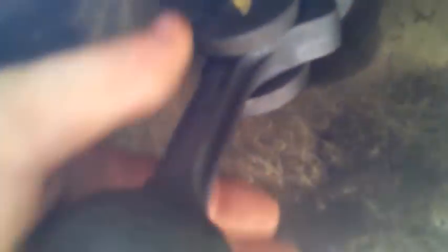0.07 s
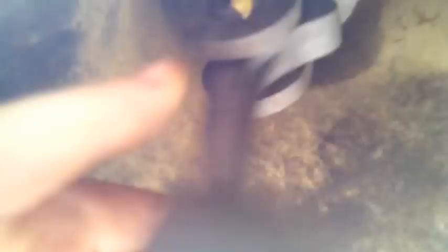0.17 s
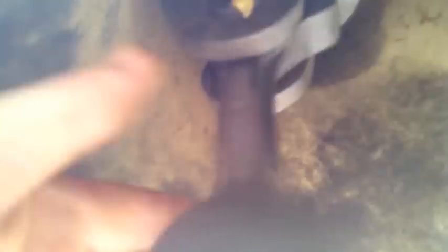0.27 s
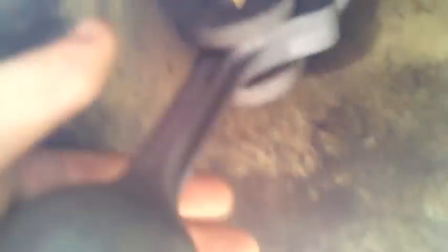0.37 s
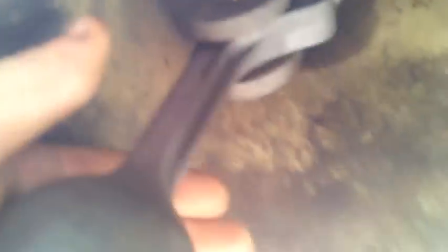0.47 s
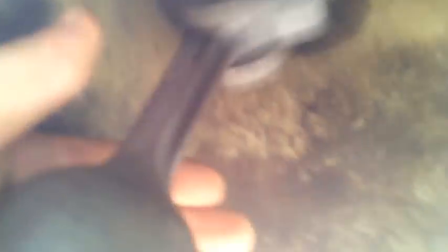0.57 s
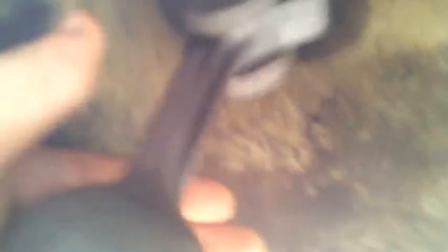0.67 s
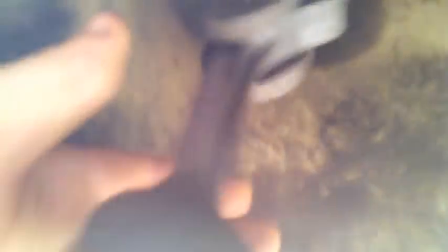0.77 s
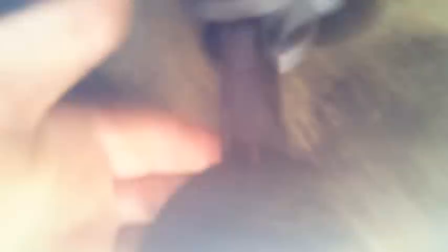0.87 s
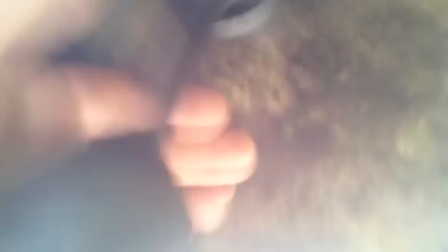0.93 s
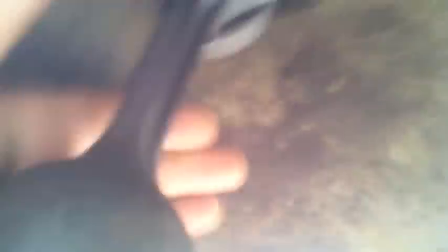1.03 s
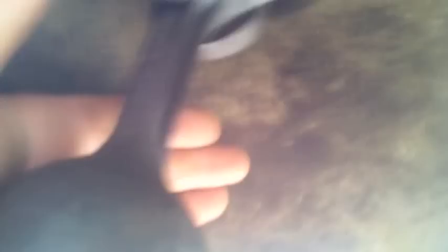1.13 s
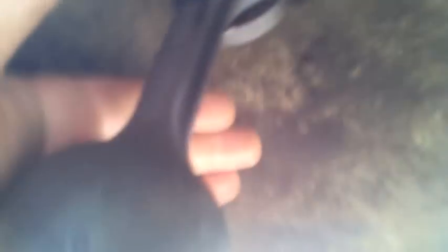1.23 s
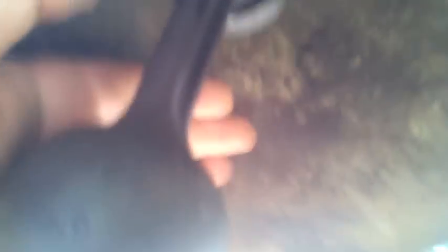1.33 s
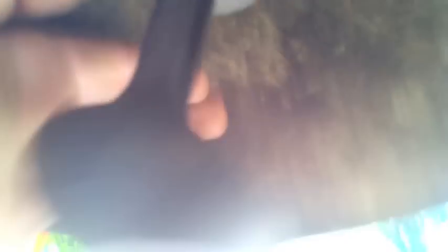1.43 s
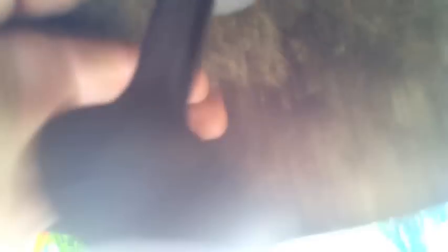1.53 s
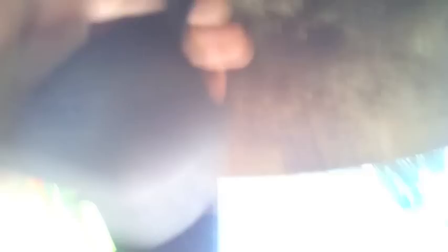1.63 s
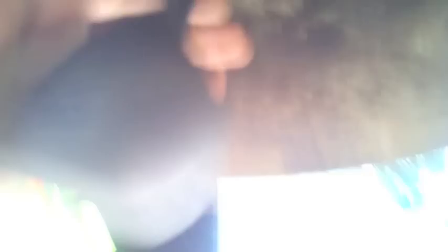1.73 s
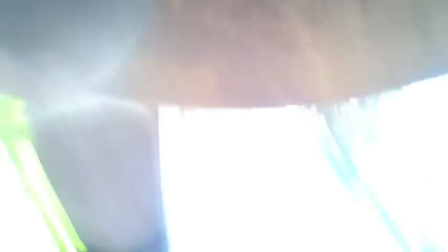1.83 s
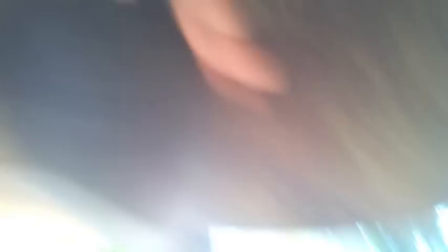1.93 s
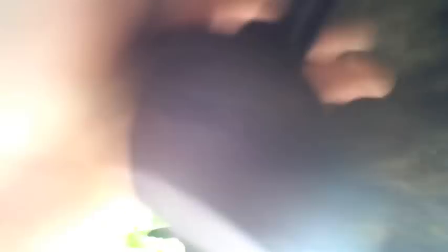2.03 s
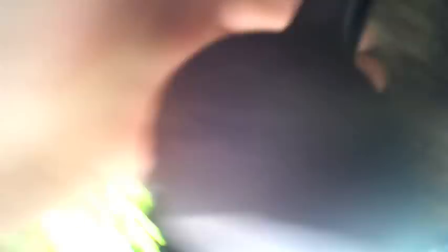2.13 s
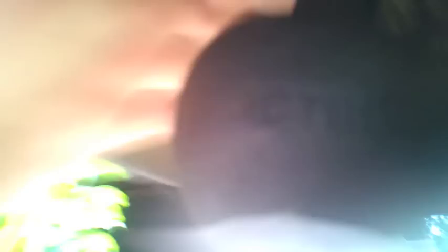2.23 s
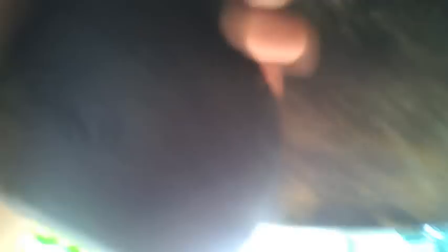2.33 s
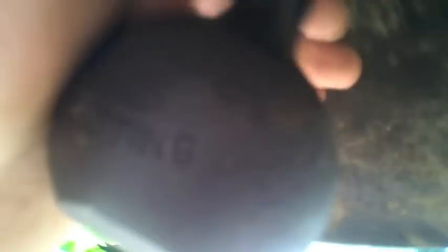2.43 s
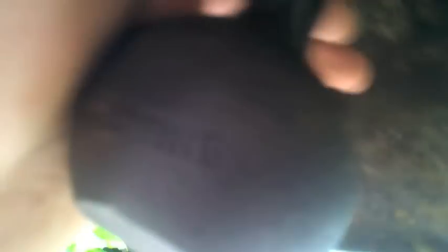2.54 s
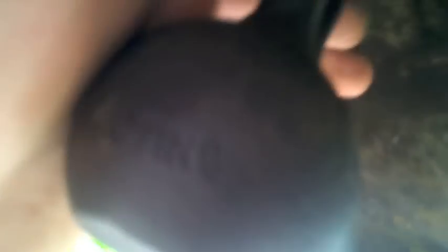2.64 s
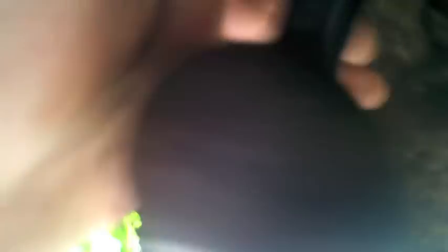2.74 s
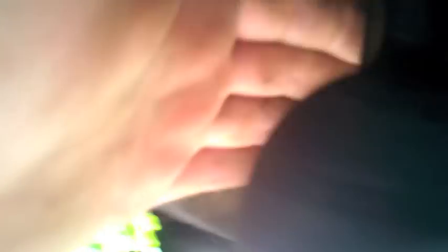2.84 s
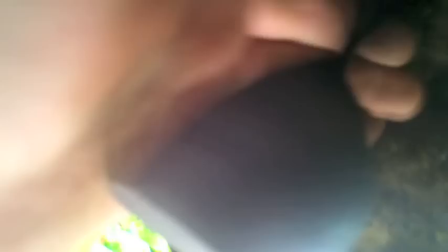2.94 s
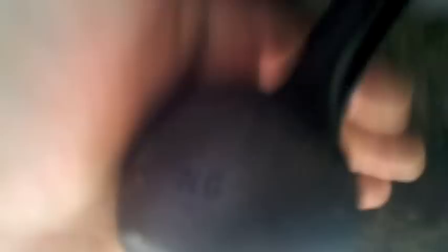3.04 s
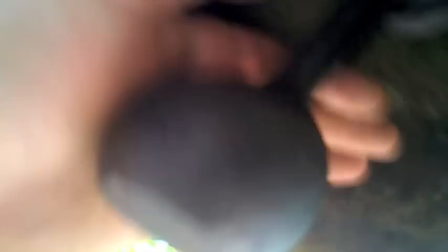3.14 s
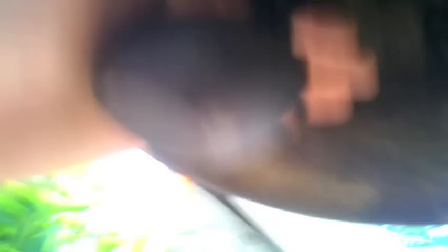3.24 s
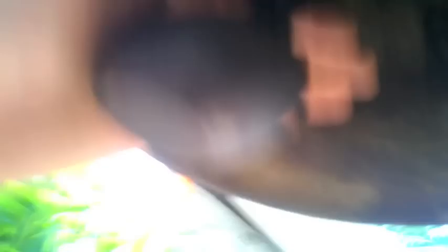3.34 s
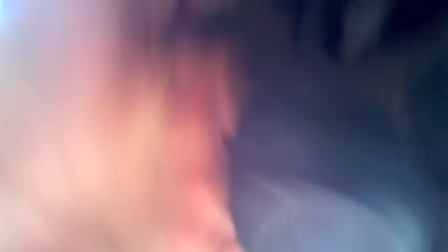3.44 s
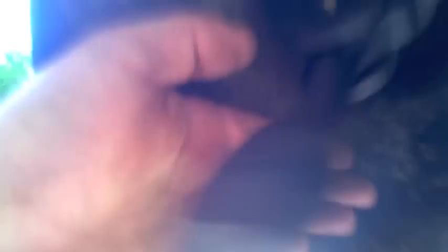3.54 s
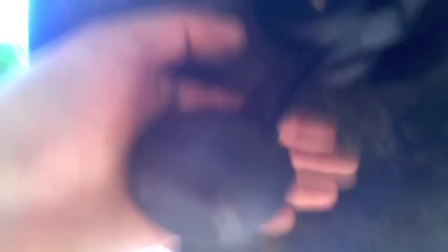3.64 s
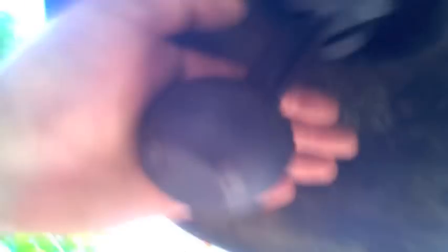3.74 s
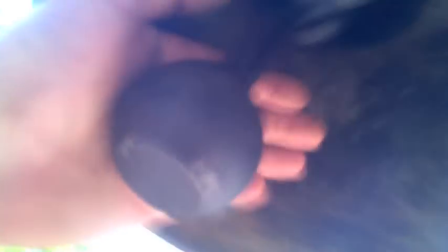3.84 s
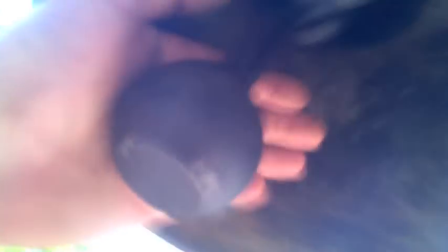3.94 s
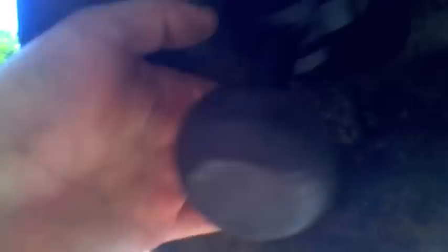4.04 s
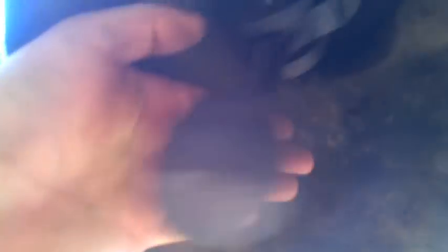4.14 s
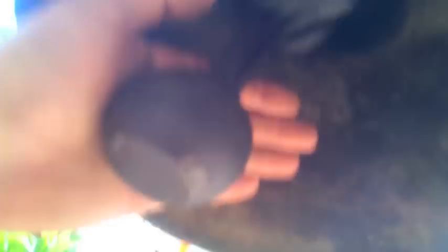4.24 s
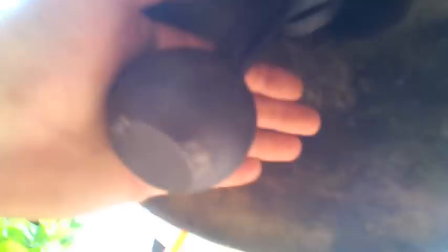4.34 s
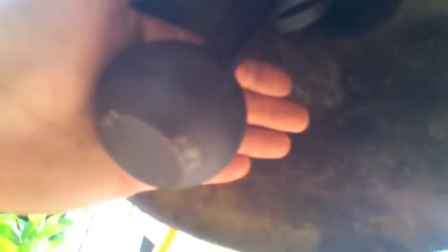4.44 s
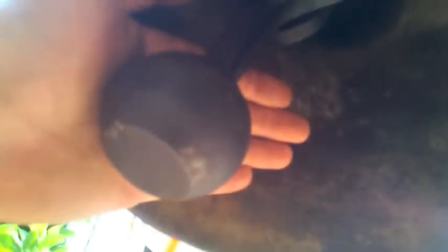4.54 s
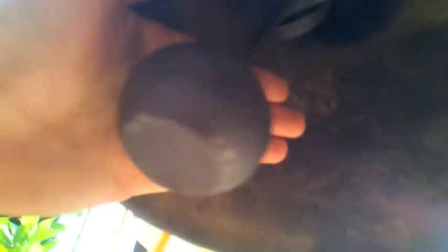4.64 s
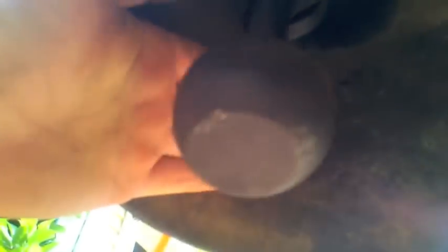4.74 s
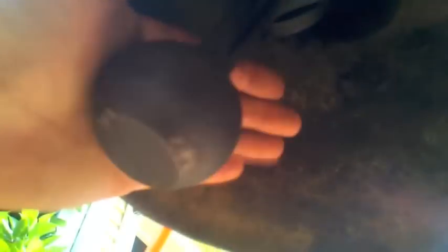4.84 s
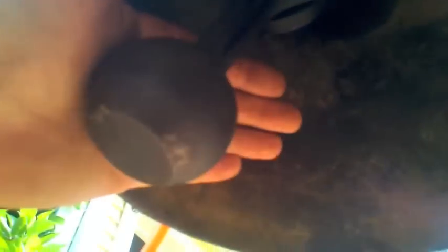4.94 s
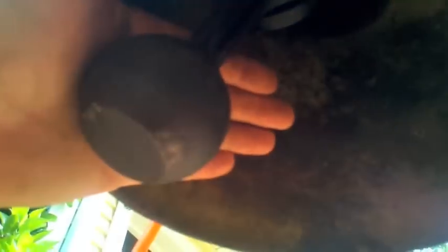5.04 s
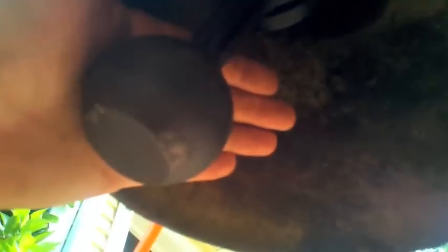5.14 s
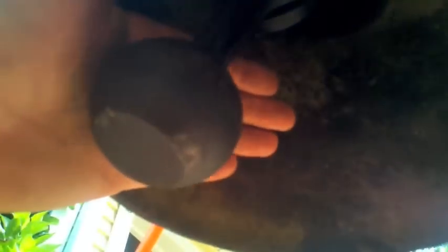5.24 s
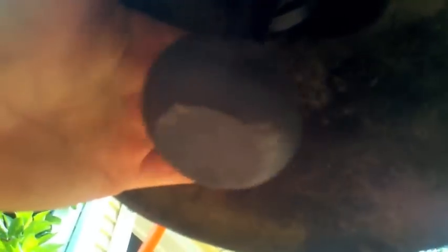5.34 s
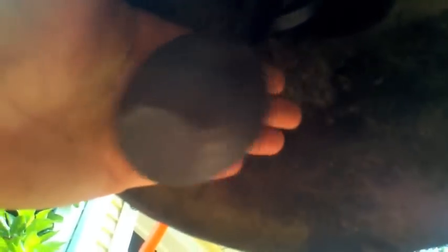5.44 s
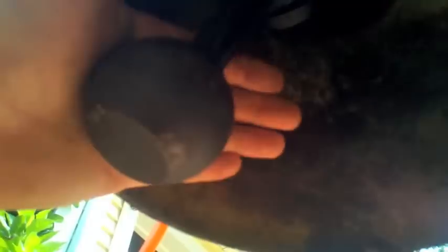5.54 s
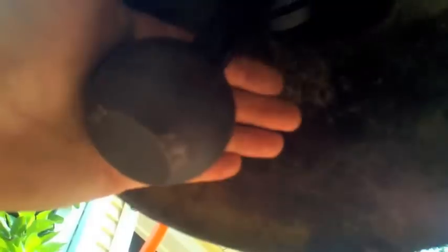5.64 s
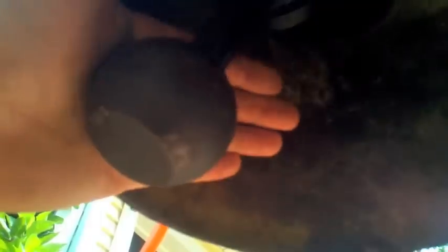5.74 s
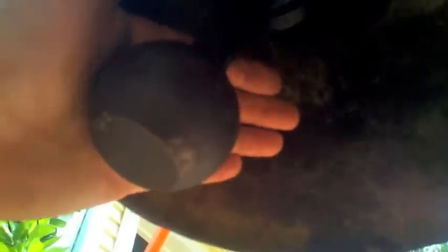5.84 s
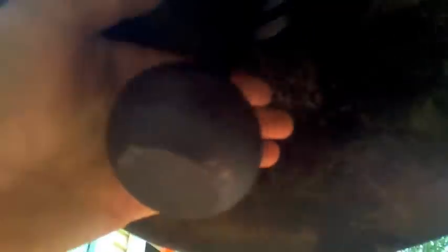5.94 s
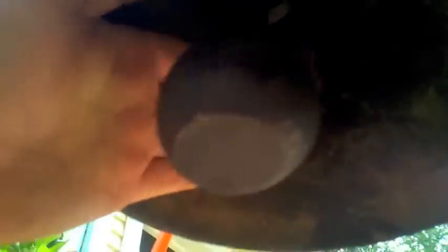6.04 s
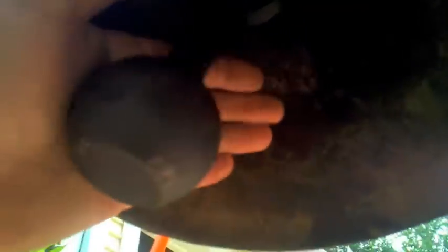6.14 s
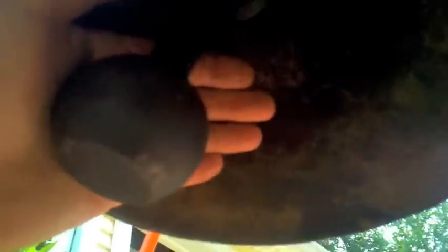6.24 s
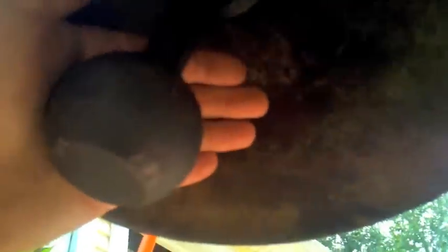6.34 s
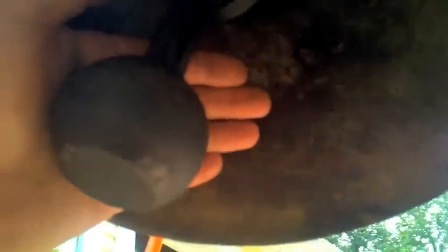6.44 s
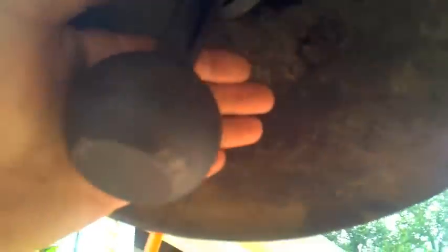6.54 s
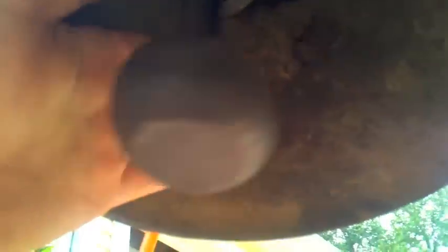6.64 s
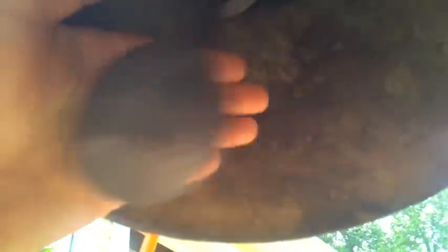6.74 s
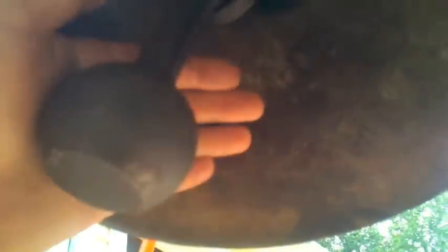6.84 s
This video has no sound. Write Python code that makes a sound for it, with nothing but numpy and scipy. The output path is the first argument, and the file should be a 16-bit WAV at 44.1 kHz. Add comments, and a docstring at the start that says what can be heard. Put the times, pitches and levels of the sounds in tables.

```python
"""Air ringer inside a locomotive bell

Outdoors, an air ringer cycles steadily inside a large steel bell; a hand keeps the clapper off the rim.
Each cycle: air rushes in, the piston slams, the linkage knocks back, then the port puffs and hisses.
These and the faint valve leak are coloured noise; the steel pings are decaying sines set off by clicks.
A small compressor drones nearby as a stack of sines, over a soft background of coloured noise."""
import sys
import numpy as np
from scipy import signal
from scipy.fft import rfft, irfft
from scipy.io import wavfile

SR = 44100
rng = np.random.default_rng(int(sys.argv[2]) if len(sys.argv) > 2 else 0)


def persist_wave(psi):
    """Save psi, clipped to +-1, as 16-bit WAV."""
    counts = np.round(np.clip(psi, -1, 1) * 32767).astype(np.int16)
    wavfile.write(sys.argv[1], SR, np.atleast_2d(counts).T)


N = 304284  # length in samples
TIME = np.arange(N) / SR  # seconds
CUTOFF_HZ = 14100


def from_db(db):
    """Turn decibels into an amplitude factor."""
    return 10 ** (np.asarray(db) / 20)


def in_time(rows):
    """Join (seconds, value) rows with straight lines, sample by sample."""
    return np.interp(TIME, *np.transpose(rows))


def colour(x, spectrum, size=4096):
    """Filter noise to a spectrum without pre-echo; white noise keeps its power, so only the shape counts."""
    hz, db = np.transpose(spectrum)
    log_bins = np.log(np.fft.rfftfreq(size, 1 / SR) + 1)
    gain = from_db(np.interp(log_bins, np.log(hz), db))
    gain[round(size * CUTOFF_HZ / SR):] /= 10
    gain /= np.sqrt(np.mean(gain ** 2))
    # folding the cepstrum gives a minimum-phase filter, which never sounds before its input
    cepstrum = irfft(np.log(gain))
    cepstrum[1:size // 2] *= 2
    cepstrum[size // 2 + 1:] = 0
    impulse = irfft(np.exp(rfft(cepstrum)))
    return signal.oaconvolve(x, impulse[None], axes=-1)[:, :N]


def noise(grain_db=0, alike=0):
    """White noise at two microphone ports, alike from 0 to 1; uneven grain sizes make it rattle."""
    sizes = from_db(grain_db * rng.standard_normal(N))
    sizes /= np.sqrt(np.mean(sizes ** 2))
    near, own = rng.standard_normal((2, N)) * sizes
    far = alike * near + np.sqrt(1 - alike ** 2) * own
    return np.array([near, far])


def drift(per_s):
    """Wander slowly between random values with a spread near 1, per_s new values each second."""
    knots = rng.standard_normal(1000)
    return np.interp(TIME * per_s, np.arange(len(knots)), knots)


def bursts(times, levels_db, rise, hold, t60):
    """Envelope of events that swell, then die away by 60 dB per t60; all durations in seconds."""
    power = np.zeros(N)
    for s, db in np.broadcast(times, levels_db):
        start = max(int(s * SR), 0)
        age = TIME[:min(SR, N - start)]
        swell = np.minimum(age / rise, 1)
        decay = from_db(db - 60 * np.maximum(age - hold, 0) / t60)  # hold counts from the start
        power[start:start + len(age)] += (swell * decay) ** 2
    return np.sqrt(power)


def ring(clicks, hz, t60):
    """A damped resonance: a unit click sets a sine of height 1 ringing."""
    radius = from_db(-60 / (t60 * SR))
    angle = 2 * np.pi * hz / SR
    return signal.lfilter([np.sin(angle)], [1, -2 * radius * np.cos(angle), radius ** 2], clicks)


# The piston strikes, one per cycle, shared by the slam and the steel.
# Each row: strike level in dB, then what is added to the thud, the pings near 9 kHz and the longest rings, in dB.
STRIKES = [(-5.5, -4, 4, -4.5), (-6.5, 1, 1, 1), (-8, 6, 5, -6), (-8, -1.5, 3, 1.5), (-8, 1.5, 7, 6),
           (-8.5, -7, -2.5, -5), (-8, -0.5, -1.5, -7.5), (-8.5, -2.5, 7, -3), (-9, -1.5, 7, -4),
           (-10.5, 3.5, -1, -2), (-9, 6.5, -14, -8)]
FIRST_S, CYCLE_S = .2512, .64772  # first strike, time per cycle
REBOUND_AFTER_S, EXHAUST_AFTER_S = .0737, .1605  # delays after each strike


def strike_times():
    """The ringer runs like a clock: one strike per cycle, in seconds."""
    return FIRST_S + CYCLE_S * np.arange(len(STRIKES))


# Tone of the outdoor background.
# Each row: frequency in Hz, relative strength in dB per Hz.
YARD_TONE = [(25, -24), (60, -3), (120, 5), (250, 0), (450, 3), (900, -15.5), (1400, -3), (2000, -20),
             (2550, -15), (3200, -9), (4500, -20.5), (8000, -12.5)]


def yard(level_db=-56.5):
    """Soft steady noise, largely alike at both ports."""
    return from_db(level_db) * colour(noise(alike=0.66), YARD_TONE)


# How fast the compressor turns.
# Each row: time in seconds, turns per second.
COMPRESSOR_SPEED = [(0, 44.85), (2.7, 44.75), (3.1, 44.4), (3.45, 44.4), (3.7, 44.75), (6.9, 44.8)]
# Its strong orders, which are sines at whole multiples of the turning speed.
# Each row: multiple, basic level in dB in the open, basic level in dB with the microphone behind the clapper.
STRONG_ORDERS = [(2, -78.5, -76), (3, -63.5, -67), (4, -62.5, -67.5), (5, -68, -79), (6, -61, -64),
                 (7, -77.5, -59.5), (8, -59, -56.5), (9, -74.5, -66), (10, -56, -66.5), (11, -60.5, -67),
                 (12, -62.5, -67), (14, -66.5, -68.5), (15, -78.5, -65.5), (16, -77, -72), (17, -57, -60),
                 (18, -77, -65.5), (19, -67, -69.5), (20, -73, -73), (28, -71, -72), (29, -77, -74),
                 (30, -60, -85), (31, -57, -71.5), (32, -93, -80), (34, -65, -85)]
# How far the microphone is tucked behind the clapper.
# Each row: time in seconds, share from 0 to 1.
TUCKED = [(2.55, 0.49), (3.05, 1.0), (3.45, 1), (3.8, 0.5)]


def compressor(weak_db=-74.0, waver_db=2.4, top_fall_db=-15.0, bass_db=17.0, bass_reach=5.0, count=66):
    """A stack of orders throbs once a turn; their balance wavers and shifts as the microphone moves."""
    turn = 2 * np.pi * np.cumsum(in_time(COMPRESSOR_SPEED)) / SR
    tucked = in_time(TUCKED)
    strong = {round(order): levels for order, *levels in STRONG_ORDERS}
    drone = np.zeros(N)
    for order in range(2, count):
        weak = weak_db + top_fall_db * order / count
        open_db, tucked_db = strong.get(order, [weak, weak])
        db = open_db + (tucked_db - open_db) * tucked
        db = db + waver_db * drift(1.51)
        # low orders are boosted, since the stereo widening thins the bass
        db = db + bass_db * np.exp(-order / bass_reach)
        smear = np.pi / 2 * rng.standard_normal()  # reflections blur the pulse
        drone += from_db(db) * np.sin(order * turn + smear)
    return np.sqrt(2) * drone


# Tone of the valve leak.
# Each row: frequency in Hz, relative strength in dB per Hz.
LEAK_TONE = [(2500, -5.5), (3300, -11), (5000, -14), (6500, -14), (8800, -12.5), (10500, -6), (12000, 1),
             (13700, -4.5)]
# How strongly the valve leaks; this also sways the exhaust hiss.
# Each row: time in seconds, level in dB before the gain in leak().
LEAKING = [(0.0, -48.5), (1.3, -46), (2.0, -54.5), (2.8, -53.5), (3.8, -50), (6.9, -52)]


def leak(gain_db=-5.0):
    """Air escaping at the valve makes a thin, unbroken hiss that slowly changes in strength."""
    return from_db(in_time(LEAKING) + gain_db) * colour(noise(), LEAK_TONE)


# Tones of the exhaust puff and of flowing air (the hiss, and the piston's inrush).
# Each row: frequency in Hz, relative strength in dB per Hz.
PUFF_TONE = [(100.0, -11), (250.0, -5.5), (420.0, -1.5), (750.0, -16), (1200.0, -3), (2000.0, -13),
             (3000.0, 5), (4000.0, -8), (4700.0, -11.5), (6500.0, -4), (9000.0, -2), (11000.0, -5.5),
             (13600.0, -7)]
VENT_TONE = [(500, -14.5), (1200, -0.5), (1900, 4), (2550, 3.5), (3200, 6), (4800, -9), (6000, -6),
             (7500, 10.5), (9000, 6), (10500, 10), (11800, 5), (13700, 8.5)]


def exhaust(puff_db=-24.5, hiss_db=-47.0, leak_share=0.32):
    """The port opens with a sharp puff; the cylinder empties with a soft hiss, stronger with more leak."""
    s = strike_times() + EXHAUST_AFTER_S
    leak_db = np.interp(s, *np.transpose(LEAKING))
    hiss_levels_db = hiss_db + leak_share * (leak_db - leak_db.mean())
    puff = bursts(s - .002, puff_db, rise=0.0049, hold=0.0056, t60=0.068)
    hiss = bursts(s, hiss_levels_db, rise=0.013, hold=0.07, t60=1.0)
    puff_sound = colour(puff * noise(grain_db=1.0, alike=0.44), PUFF_TONE)
    hiss_sound = colour(hiss * noise(alike=0.075), VENT_TONE)
    return puff_sound + hiss_sound


# Tones of the linkage's knock and clink.
# Each row: frequency in Hz, relative strength in dB per Hz.
KNOCK_TONE = [(100.0, -15), (250.0, -5.5), (420.0, 9.5), (700.0, -22), (1150.0, -1), (2400.0, -15),
              (3200.0, -17), (4300.0, -18), (5200.0, -11), (7000.0, -14), (8500.0, -8.5), (10800.0, 8),
              (12500.0, -38), (13800.0, -69)]
CLINK_TONE = [(3000, -19), (4050, -4), (4300, 6.5), (4550, -12), (5600, -34)]


def rebound(knock_db=-28.5, clink_db=-32.5):
    """The linkage falls back with a duller, hollow knock and a short clink."""
    s = strike_times() + REBOUND_AFTER_S - .001
    knock = bursts(s, knock_db, rise=0.0009, hold=0.0017, t60=0.082)
    clink = bursts(s, clink_db, rise=0.00043, hold=0.0019, t60=0.025)
    knock_sound = colour(knock * noise(grain_db=1.5, alike=0.74), KNOCK_TONE)
    clink_sound = colour(clink * noise(alike=0.08), CLINK_TONE)
    return knock_sound + clink_sound


# Tones of the slam: its bright clack, its deep thud and the body between them.
# Each row: frequency in Hz, relative strength in dB per Hz.
CLACK_TONE = [(500, -13), (900, -9), (1400, 2.5), (1950, -1), (2500, -6.5), (3200, 4), (4000, 4.5),
              (4400, -7), (5400, 2.5), (6500, -4.5), (8500, 3), (9700, 5), (10400, -0.5), (12400, 2.5),
              (13700, -3)]
THUD_TONE = [(25, -2), (60, -7.5), (120, -2), (250, -2), (400, -0.5), (700, -31.5), (2000, -28)]
BODY_TONE = [(200, -28.5), (420, 3), (620, -1), (850, -2), (1300, -18.5), (3000, -62)]


def piston():
    """Air rushes in; the piston slams home with a dense rattle, a thud and a short echo inside the bell."""
    s = strike_times()
    db, thud_db, _, _ = np.transpose(STRIKES)
    inrush = bursts(s - .012, db - 33, rise=0.0047, hold=0.0044, t60=0.036)
    slide = bursts(s - .004, db - 18, rise=0.013, hold=0.0038, t60=0.011)
    slam = bursts(s - .0006, db - 5.0, rise=0.00078, hold=0.003, t60=0.021)
    echo = bursts(s, db - 19.0, rise=0.0095, hold=0.0073, t60=0.19)
    thud = bursts(s, db + thud_db - 13.0, rise=0.001, hold=0.0031, t60=0.044)
    body = bursts(s, db - 17.5, rise=0.001, hold=0.0027, t60=0.032)
    clack = (slide + slam) * noise(grain_db=4.0, alike=0.026) + echo * noise(alike=0.054)
    sound = colour(inrush * noise(), VENT_TONE)
    sound += colour(clack, CLACK_TONE)
    sound += colour(thud * noise(), THUD_TONE)
    sound += colour(body * noise(alike=0.18), BODY_TONE)
    return sound


# Modes of the clapper and ringer: the notes at which the steel can ring.
# Each row: frequency in Hz, basic level in dB relative to the blow, seconds to fall 60 dB before damping.
STEEL_MODES = [(1270, -11, .05), (1570, -21, .045), (2089, -40, .4), (2650, -17, .04), (2915, -20, .07),
               (3565, -12.5, .045), (3585, -28, .85), (3587, -53, 2.5), (4770, -17, .04), (5173, -35, .25),
               (5620, -34, .3), (5886, -20, .06), (5886, -29, .36), (6098, -29, .52), (6854, -21, .07),
               (7461, -24, .3), (7530, -11, .045), (7664, -22, .32), (9087, -32, .4), (9292, -3.5, .055),
               (9398, -28, .36), (9469, -27, .38), (9776, -32, .35), (10826, -36, .35), (12009, -32, .42),
               (12235, -23, .12), (12446, -36, .42), (12620, -20, .07)]
# How hard the contact drives the modes.
# Each row: frequency in Hz, added level in dB.
CONTACT = [(1300, -1), (2800, 8.5), (3600, 6), (5800, 3.5), (7500, 6.5), (9300, 0), (12300, 3.5)]
# Extra level of the low modes at each strike.
# Each row: time in seconds, added level in dB.
LOW_MODES = [(0.25, 0.5), (1.0, 7), (3.5, 2), (4.1, -6), (6.7, 2)]
PING_BAND_HZ, LOW_BELOW_HZ = (8900, 9600), 2200
LASTING_T60_S, LONGEST_T60_S = .2, .7
# a mode builds up in a short time plus a share of its decay; the longest bloom more slowly and are stronger
BUILD_T60_S, BUILD_SHARE, BLOOM_SHARE, BLOOM_DB = 0.0047, 0.079, 0.34, 4.5


def steel(rebound_db=-28.5, scatter_db=1.5, contact_s=.0015, far_db=-6.5, lasting_db=-3.5, damping=0.99,
          earlier_s=0.23):
    """Strikes and knocks ring the same modes; long ones swell as energy seeps into them."""
    s = strike_times()
    db, _, ping_db, ring_db = np.transpose(STRIKES)
    low_db = np.interp(s, *np.transpose(LOW_MODES))
    times = np.r_[s, s + REBOUND_AFTER_S]
    out = np.zeros((2, N))
    for hz, mode_db, t60 in STEEL_MODES:
        low = hz < LOW_BELOW_HZ
        ping = PING_BAND_HZ[0] < hz < PING_BAND_HZ[1]
        longest = t60 > LONGEST_T60_S
        mode_db = mode_db + np.interp(hz, *np.transpose(CONTACT))
        mode_db = mode_db + lasting_db * (t60 > LASTING_T60_S) + BLOOM_DB * longest

        strike_db = db + low_db * low + ping_db * ping + ring_db * longest
        blow_db = np.r_[strike_db, np.full(len(s), rebound_db)]
        scatter = scatter_db * rng.standard_normal(len(times))
        strength = from_db(blow_db + mode_db + scatter)

        # each port hears the contact at its own random moment
        delays = contact_s * rng.random((len(times), 2))
        at = ((times[:, None] + delays) * SR).astype(int)
        clicks = np.full((2, N), 1e-18)  # a tiny floor instead of exact zero
        clicks[0, at[:, 0]] = strength
        clicks[1, at[:, 1]] = strength * from_db(far_db)
        # the stroke before the start still sounds at the near port
        clicks[0, 0] = from_db(db[0] + mode_db - 60 * earlier_s / t60)

        # subtracting a faster decay makes the ring swell gradually
        build_t60 = BUILD_T60_S + (BLOOM_SHARE if longest else BUILD_SHARE) * t60
        out += ring(clicks, hz, t60 / damping) - ring(clicks, hz, build_t60)
    return out


def scene():
    """Add all sources at the two ports; the left one faces away and is 3 dB weaker."""
    near, far = yard() + compressor() + leak() + exhaust() + rebound() + piston() + steel()
    return np.array([far * from_db(-3), near])


def record(dry, crossfeed=0.81, crossfeed_s=.000385, left_db=1):
    """Widen the stereo by subtracting a late copy of the other port, soften peaks and cut the top."""
    late = np.array([np.interp(TIME - crossfeed_s, TIME, port) for port in dry[::-1]])
    wide = (dry - crossfeed * late) * from_db([[left_db], [0]])
    top_cut = signal.ellip(12, .1, 70, CUTOFF_HZ - 200, fs=SR, output="sos")
    return signal.sosfilt(top_cut, np.tanh(wide))


dry = scene()
out = record(dry)
persist_wave(out)
```